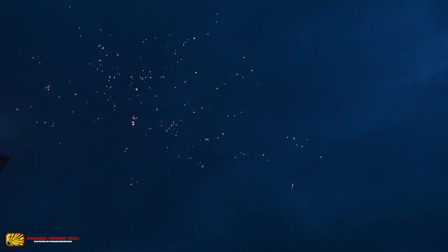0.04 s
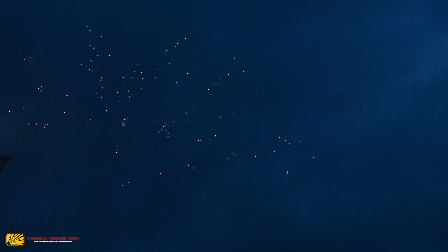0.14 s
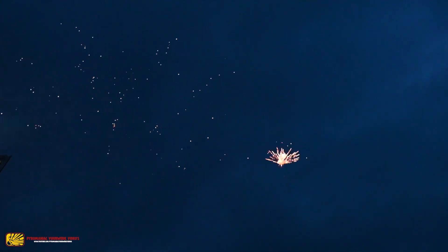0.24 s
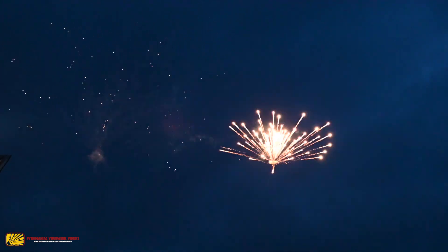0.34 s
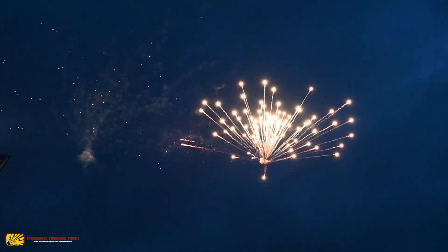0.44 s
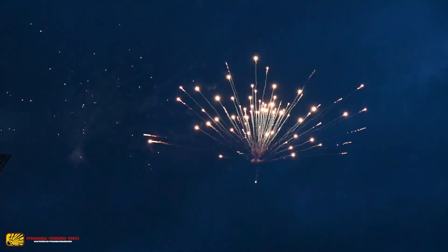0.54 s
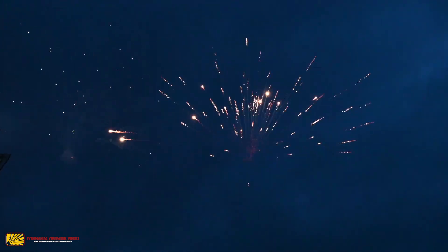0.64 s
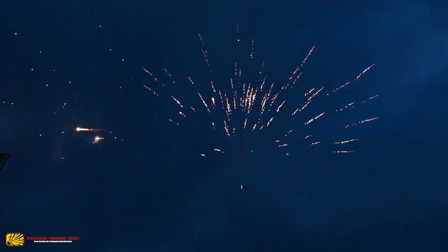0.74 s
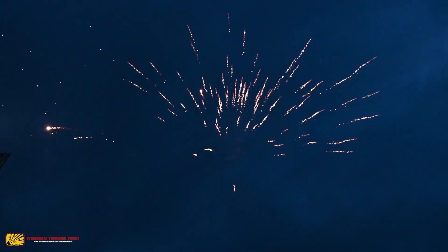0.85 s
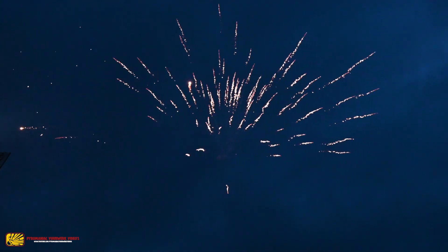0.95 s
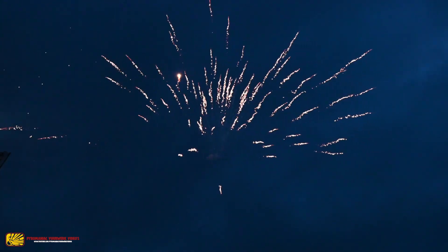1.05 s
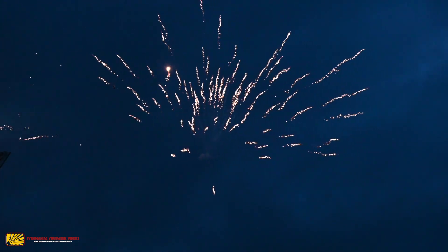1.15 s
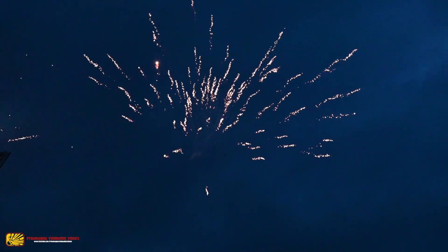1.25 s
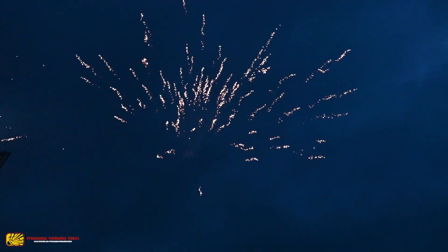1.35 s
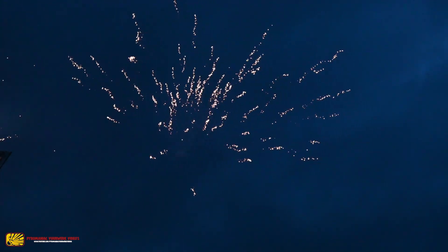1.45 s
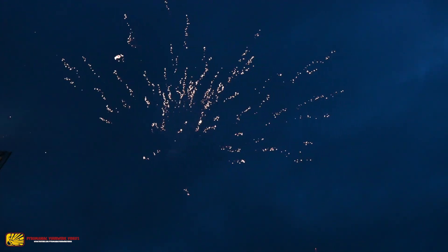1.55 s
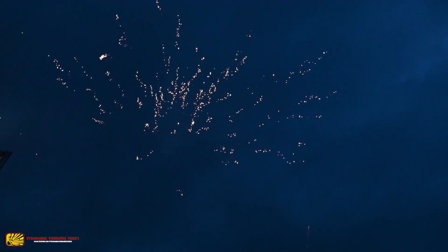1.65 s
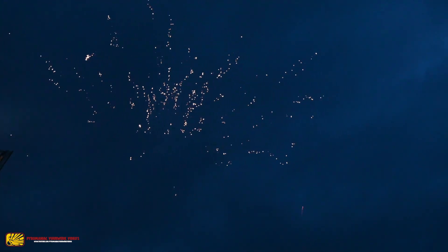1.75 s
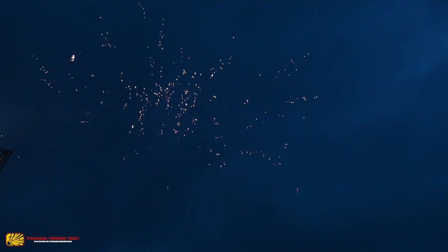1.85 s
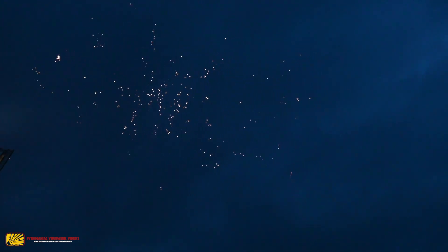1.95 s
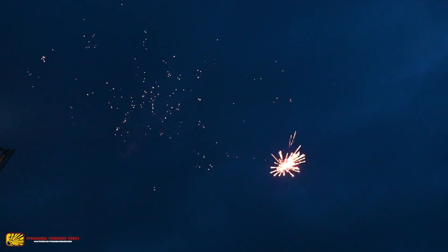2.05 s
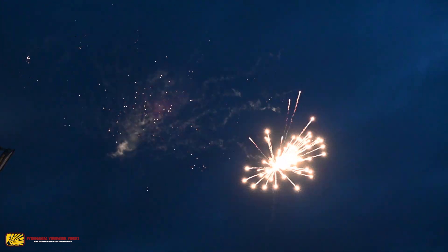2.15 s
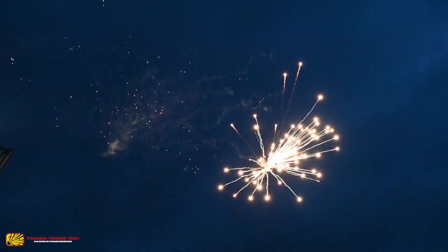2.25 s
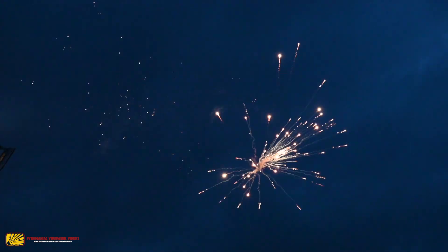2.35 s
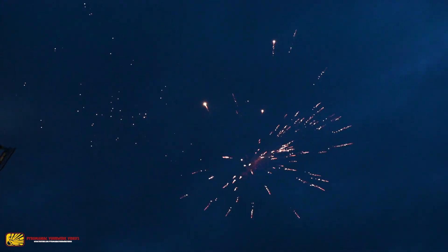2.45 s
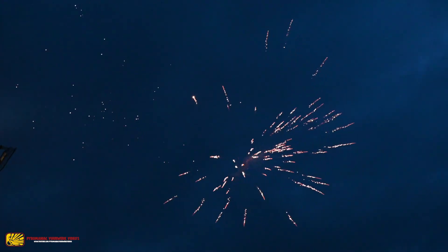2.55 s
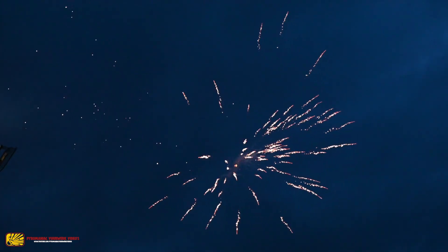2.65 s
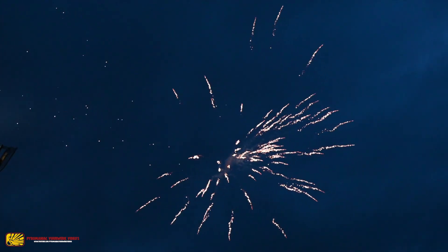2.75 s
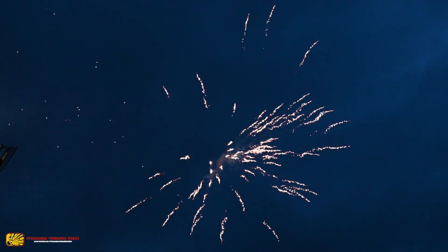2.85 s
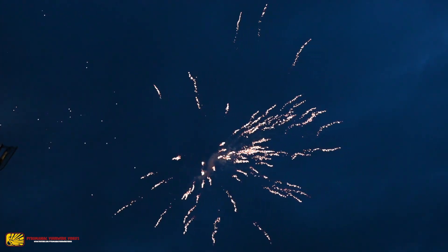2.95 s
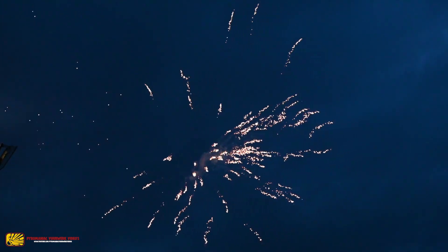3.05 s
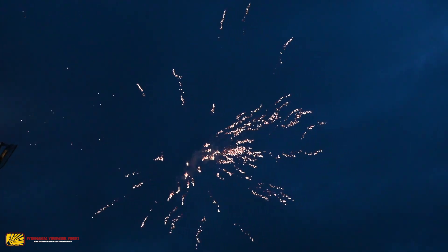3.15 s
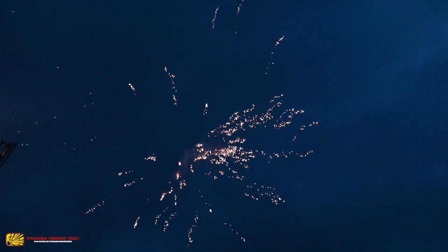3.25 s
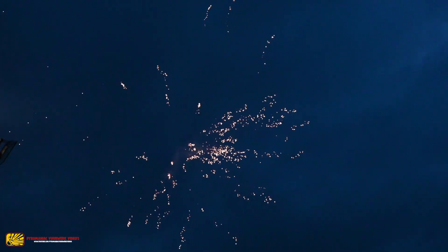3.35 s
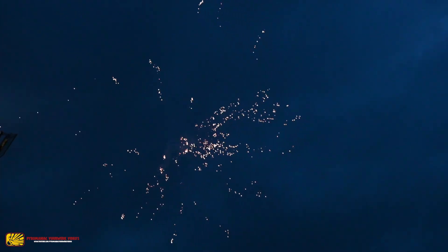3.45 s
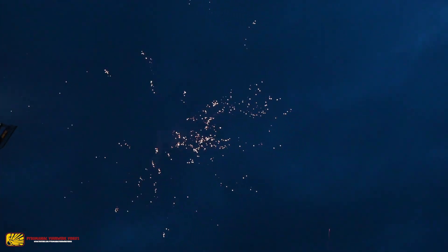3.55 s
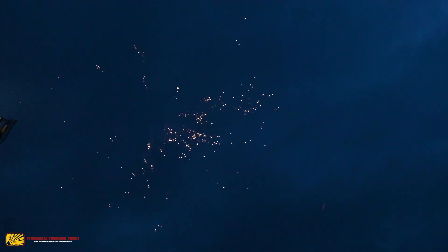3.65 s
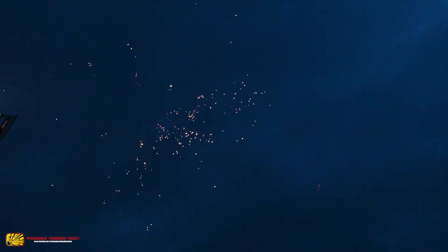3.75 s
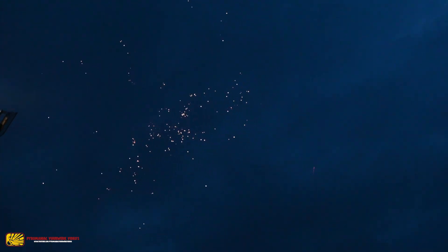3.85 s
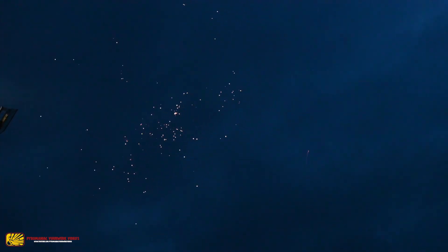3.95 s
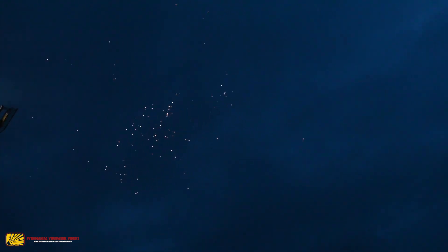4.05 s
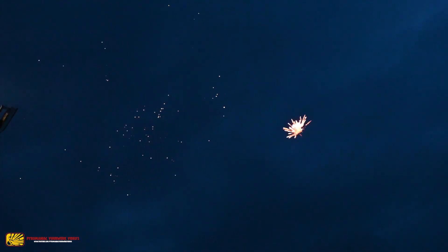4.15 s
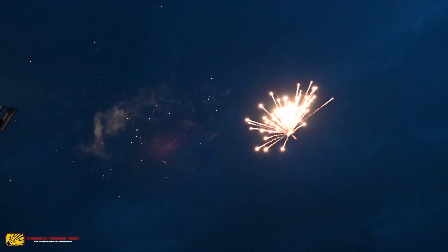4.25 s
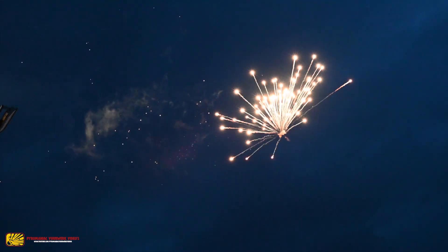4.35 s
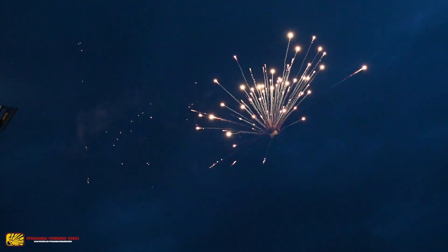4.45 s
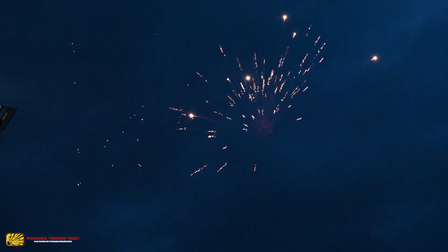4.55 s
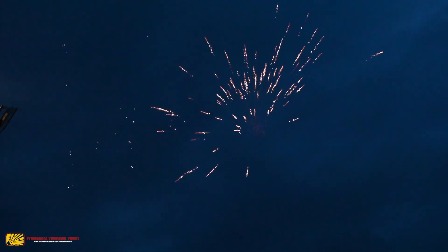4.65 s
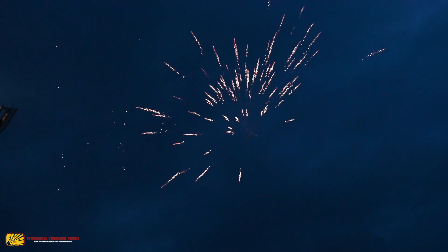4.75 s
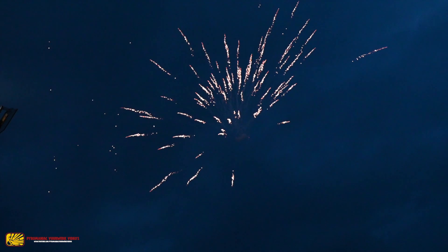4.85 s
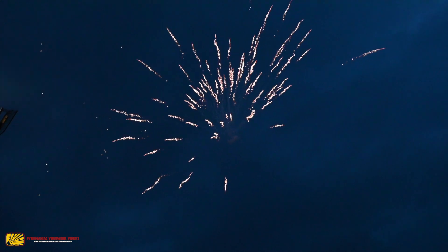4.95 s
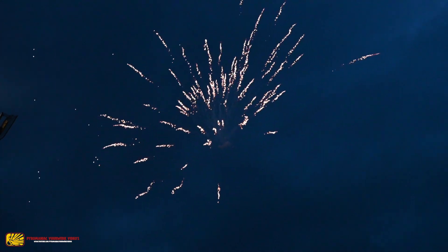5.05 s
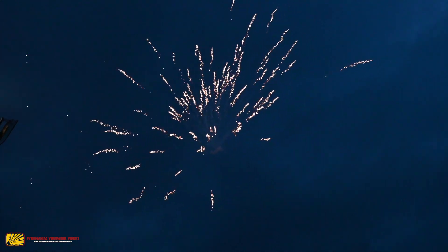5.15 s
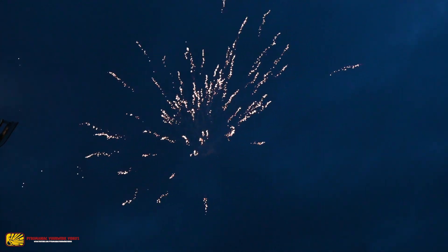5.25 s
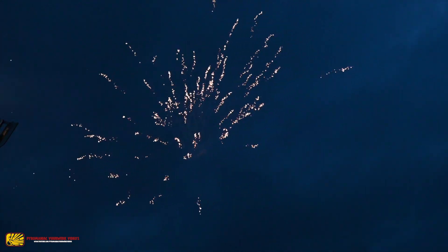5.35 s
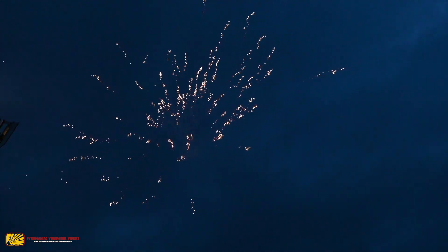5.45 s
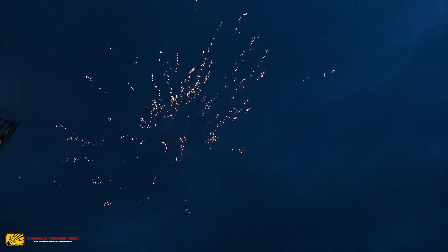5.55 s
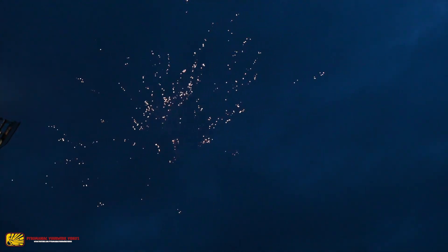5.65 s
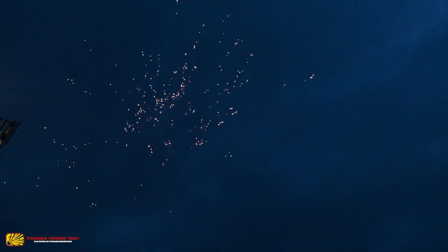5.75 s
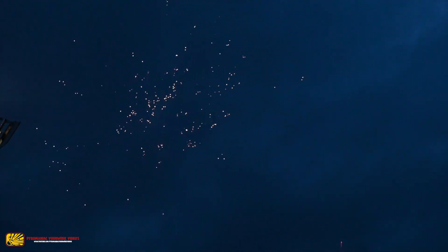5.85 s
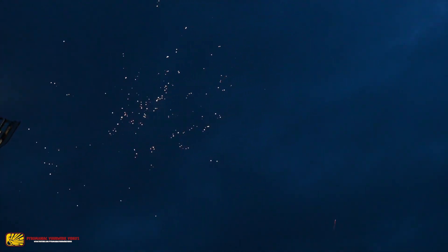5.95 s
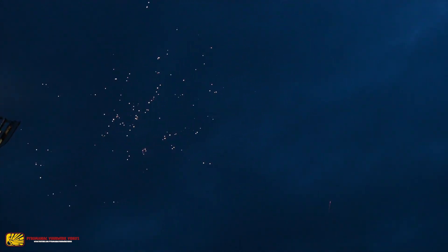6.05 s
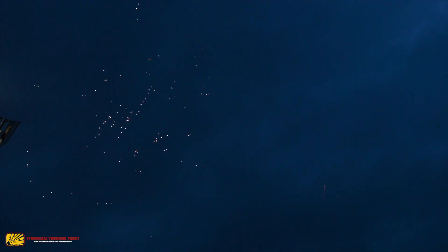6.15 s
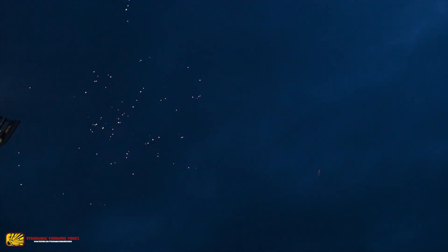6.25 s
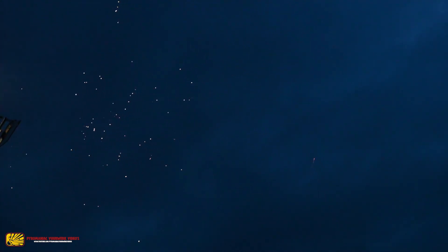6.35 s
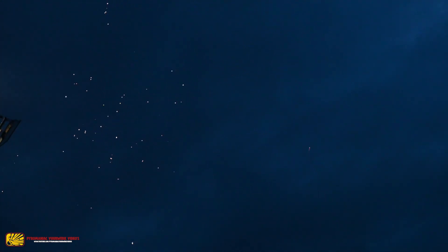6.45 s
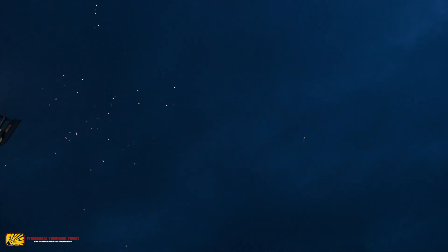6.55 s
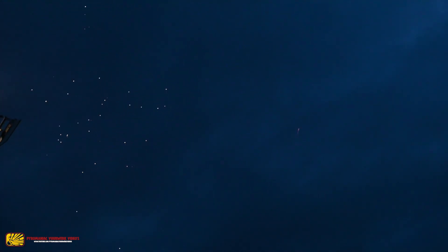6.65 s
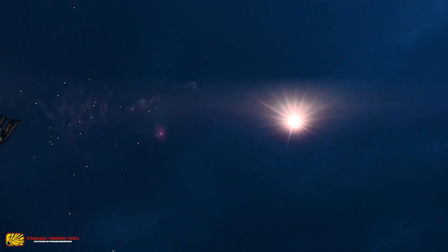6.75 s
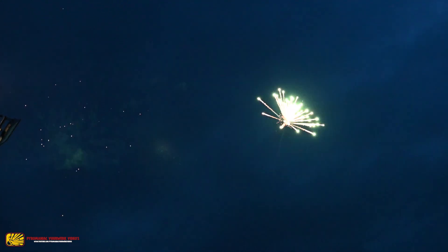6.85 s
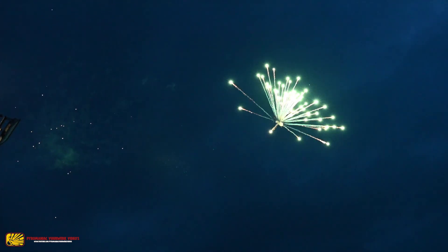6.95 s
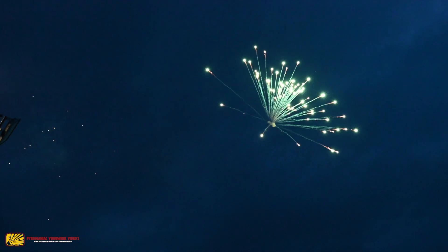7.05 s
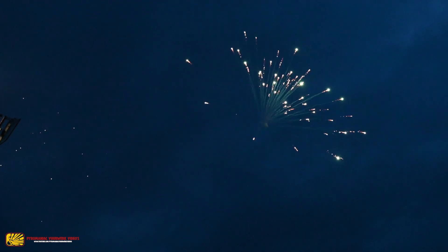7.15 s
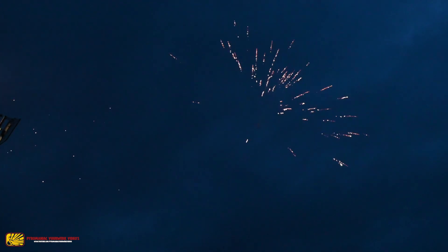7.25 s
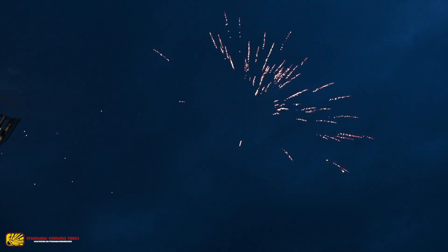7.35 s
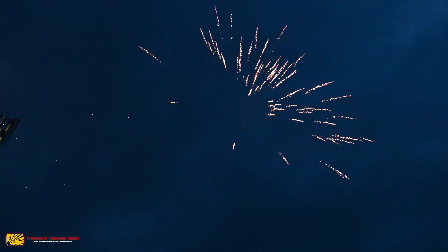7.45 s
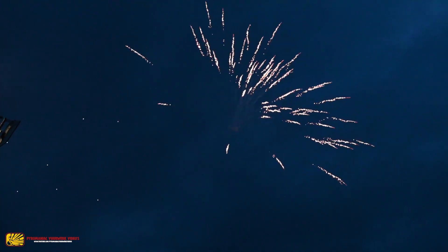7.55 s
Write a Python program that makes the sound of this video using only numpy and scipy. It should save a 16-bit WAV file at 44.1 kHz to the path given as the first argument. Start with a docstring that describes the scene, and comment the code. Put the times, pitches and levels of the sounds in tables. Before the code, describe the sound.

Open field at night, picked up by a phone with two exposed microphone ports. Gusty wind rumbles and flutters throughout over a thin, wavering hiss, with blunt slaps mostly on the right. At about 0.5 s a firework shell bursts overhead: a hard, clipped crack and short ringing boom, then lumpy echoes from walls and trees fading over a second or so. Tiny breathy high chirps appear faintly up to 2.2 s. A hollow launch thud sounds at 1.1 s, and a second overloaded burst at 2.3 s. Another tube thump follows at 3.0 s amid strong wind knocks until about 4 s, with a third bang at 4.4 s. A last thud comes at 5.5 s. From there the wind grows fierce, battering the right side through 6 and 7 s. The fourth shell explodes at 7.1 s, its echoes trailing to the end. Sparse, faint, bright star crackles dot the gaps.

```python
"""Gusty wind blows throughout, slapping a phone's two microphone ports on an open field at night, over a thin hiss.
Half a second in, a firework shell bursts overhead and overdrives the microphones; three more follow,
and lift charges thud in their tubes between them. Walls and trees send scattered echoes back.
Wind is noise and random eddies, harder on the right port; bursts are pressure pulses with a ringing boom;
launches are puffs ringing a tube; burning stars crackle as snaps of bright noise; faint chirps are narrow noise."""
import sys
import numpy as np
from scipy import signal
from scipy.fft import rfft, irfft
from scipy.io import wavfile
from scipy.ndimage import uniform_filter1d

SR = 44100
rng = np.random.default_rng(int(sys.argv[2]) if len(sys.argv) > 2 else 0)


def int16_out(signal):
    """Quantize to a 16-bit WAV file."""
    q = np.round(np.clip(np.atleast_2d(signal).T, -1, 1) * 32767)
    wavfile.write(sys.argv[1], SR, q.astype(np.int16))


N = 335160


def undb(db):
    """Gain of a level in dB."""
    return 10 ** (np.asarray(db) / 20)


def unit(x):
    """Scale to rms 1."""
    return x / np.sqrt(np.mean(x ** 2))


def clock(length_s):
    """Sample times from zero, in seconds."""
    return np.arange(int(length_s * SR)) / SR


def low(x, hz, order=4):
    """Butterworth low-pass."""
    return signal.sosfilt(signal.butter(order, hz, fs=SR, output="sos"), x)


def band(x, lo_hz, hi_hz, order=2):
    """Butterworth band-pass."""
    edges = [lo_hz, min(hi_hz, .45 * SR)]
    return signal.sosfilt(signal.butter(order, edges, "band", fs=SR, output="sos"), x)


def ring(x, modes):
    """Sum of resonances."""
    return sum(undb(db) * band(x, hz - w / 2, hz + w / 2, order=1) for hz, w, db in modes)


def sides(pan_db):
    """Left and right gains for a level difference, left minus right."""
    return undb(np.array([pan_db, -pan_db]) / 2)


def add(out, s, x):
    """Mix x into out from time s."""
    i = int(s * SR)
    n = min(x.shape[-1], N - i)
    out[:, i:i + n] += x[..., :n]


def walk(rate):
    """Random levels, drawn rate times a second, with straight glides between them."""
    k = int(SR / rate)
    held = np.repeat(rng.standard_normal(N // k + 1), k)
    return 1.02 * uniform_filter1d(held, k)[:N]


# spectrum of the night air across the field: (frequency [Hz], relative level [dB per Hz])
NIGHT_SPECTRUM = [(750, -3.5), (1100, 4.5), (1600, -8.5), (2300, -5), (2900, -28), (4000, -13), (5200, -21),
                  (9000, -26.5), (15000, -20)]
# hiss of the night and of far burning stars: (time [s], level [dB])
HISS_LEVELS = [(0, -53), (1.001, -56.5), (1.7, -52), (2.2, -53.5), (3.2, -49.5), (4.3, -51.5), (5.2, -53.5),
               (6.0, -53), (6.901, -54), (7.6, -48.5)]
# a narrow flickering band, level relative to the rest of the hiss
SHIMMER_HZ, SHIMMER_WIDTH_HZ, SHIMMER_DB = 3266, 280, -13
SHIMMER_S, SHIMMER_FADE_S = 3.8, 1  # it is clearest then, and 1 dB down this far away


def night():
    """Hiss of the distant surroundings: third-octave steps of noise bands, each wavering by itself."""
    t = np.arange(N) / SR
    hz, db = np.transpose(NIGHT_SPECTRUM)
    hiss = 0
    for centre in 750 * 2 ** np.arange(0, 4.4, 1 / 3):
        level_db = np.interp(np.log(centre), np.log(hz), db)
        level_db = level_db + 10 * np.log10(centre)  # bands widen with frequency
        level_db = level_db + 0.5 * walk(2.1) + 3.1 * walk(30)
        noise = band(rng.standard_normal((2, N)), centre / 1.2, centre * 1.2)
        hiss = hiss + undb(level_db) * unit(noise)
    shimmer_db = SHIMMER_DB + 3.8 * walk(25) - ((t - SHIMMER_S) / SHIMMER_FADE_S) ** 2
    half_hz = SHIMMER_WIDTH_HZ / 2
    shimmer = band(rng.standard_normal((2, N)), SHIMMER_HZ - half_hz, SHIMMER_HZ + half_hz)
    hiss = unit(hiss) + undb(shimmer_db) * unit(shimmer)
    return undb(np.interp(t, *np.transpose(HISS_LEVELS))) * unit(hiss)


# wind at the sheltered left port: (time [s], rumble level [dB])
WIND_LEFT_LEVELS = [(0.0, -20), (0.1, -32.5), (0.32, -30.5), (0.68, -23), (1.26, -32.5), (1.34, -25),
                    (1.38, -38), (1.6, -24.5), (1.66, -37), (1.82, -33), (1.88, -26.5), (2.1, -36.5),
                    (2.44, -25.5), (2.64, -31), (2.76, -23), (2.96, -39), (3.02, -27), (3.08, -30.5),
                    (3.34, -30), (3.62, -30.5), (3.8, -37.5), (3.94, -27.5), (4.14, -39), (4.56, -27),
                    (4.76, -33), (5.22, -34), (5.4, -39.5), (5.48, -21), (5.72, -32.5), (7.58, -24.5)]
# wind at the exposed right port: (time [s], rumble level [dB])
WIND_RIGHT_LEVELS = [(0.0, -21), (0.1, -21), (0.2, -23), (0.24, -30.5), (0.3, -19.5), (0.36, -34),
                     (0.44, -27), (0.5, -24), (0.68, -20.5), (0.8, -22), (0.88, -24.5), (1.0, -27.5),
                     (1.08, -24), (1.16, -30), (1.3, -26.5), (1.34, -27), (1.5, -26), (1.6, -23.5),
                     (1.7, -27), (1.72, -44), (1.74, -30), (1.98, -26.5), (2.04, -24.5), (2.1, -28),
                     (2.44, -24.5), (2.64, -26.5), (2.72, -26), (2.82, -21), (2.88, -20.5), (2.94, -18.5),
                     (2.98, -17.5), (3.1, -23), (3.16, -39), (3.18, -28), (3.34, -31.5), (3.46, -26.5),
                     (3.66, -19.5), (3.76, -24), (3.919, -15), (4.12, -28.5), (4.36, -32), (4.66, -17),
                     (4.72, -21), (4.8, -20), (4.9, -28.5), (5.0, -24), (5.14, -30.5), (5.36, -22),
                     (5.44, -26), (5.5, -15), (5.56, -16.5), (5.6, -15), (5.655, -14.5), (5.72, -22),
                     (5.8, -22), (6.08, -18), (6.2, -17), (6.32, -21.5), (6.38, -18.5), (6.42, -20),
                     (6.48, -14.5), (6.56, -21.5), (6.659, -14), (6.78, -23), (6.9, -16.5), (6.96, -21),
                     (7.16, -15.5), (7.32, -24), (7.38, -17), (7.52, -17), (7.58, -13)]
# strong eddies slapping the right port: (time [s], peak [dB], swing scale [Hz], low-pass edge [Hz])
WIND_SLAPS = [(0.0482, -22, 650, 700), (0.061, -11, 280, 1200), (0.0891, -6.5, 330, 970),
              (0.112, -21, 650, 900), (0.1784, -14, 630, 1390), (0.1972, -28, 380, 900),
              (0.2167, -24, 290, 1000), (0.2448, -25, 500, 750), (0.283, -15.5, 650, 1030),
              (0.2955, -24, 650, 704), (0.3874, -11.5, 280, 700), (0.4567, -21, 600, 700),
              (0.4675, -19, 300, 696), (0.836, -17.5, 650, 1900), (0.8762, -23, 330, 850),
              (0.884, -16.5, 290, 1000), (0.948, -21.5, 530, 1350), (1.054, -34, 320, 800),
              (1.2829, -13.5, 280, 1000), (1.383, -16.5, 650, 910), (1.3913, -23, 650, 950),
              (1.411, -20, 610, 900), (1.5072, -21, 450, 750), (1.5672, -18, 610, 796),
              (1.6722, -20.5, 317, 750), (1.7668, -22, 283, 850), (1.877, -16, 650, 715),
              (1.9434, -20, 650, 705), (2.1132, -17, 320, 800), (2.1361, -20, 650, 695),
              (2.159, -27, 280, 1100), (2.21, -23, 350, 750), (2.2207, -23, 650, 800),
              (2.2425, -14, 280, 910), (2.26, -24, 650, 750), (2.401, -26, 650, 1850),
              (2.5712, -17, 650, 1530), (2.6777, -33, 330, 1250), (2.7126, -18, 300, 1550),
              (2.777, -29, 340, 1300), (2.789, -17, 280, 1000), (2.8072, -4.5, 280, 1460),
              (2.8239, -7, 290, 1000), (2.8319, -9, 650, 700), (2.862, -17, 646, 750),
              (2.9259, -9.5, 280, 1050), (2.937, -2, 282, 980), (2.9601, -8.5, 330, 1710),
              (2.9759, -13.5, 650, 950), (3.054, -6, 290, 900), (3.0596, -17.5, 650, 1800),
              (3.1, -18.0, 440, 1100), (3.526, -27, 650, 1900), (3.54, -19.5, 500, 750),
              (3.5836, -21, 380, 900), (3.5921, -8, 430, 985), (3.644, -12, 320, 955),
              (3.661, -13, 327, 800), (3.665, -13.5, 300, 950), (3.6921, -15.5, 360, 1250),
              (3.714, -15, 650, 700), (3.721, -21, 440, 1000), (3.822, -13, 520, 800),
              (3.8524, -9.5, 350, 1450), (3.8654, -12, 350, 1550), (3.8718, -9, 390, 1650),
              (3.9024, -7, 390, 1120), (3.9094, -3, 490, 1150), (3.9201, -0.5, 280, 1250),
              (3.9282, -2, 280, 1800), (3.9506, -10.5, 650, 805), (3.9875, -16, 320, 900),
              (4.005, -17, 650, 1200), (4.0362, -13, 650, 750), (4.077, -18, 310, 800),
              (4.6371, -7, 650, 1250), (4.657, -15, 650, 1350), (4.698, -15, 400, 1350),
              (4.7492, -16, 650, 700), (4.7583, -8, 400, 900), (4.7665, -18, 280, 900),
              (4.7915, -14.5, 500, 1300), (4.8362, -20, 420, 1300), (4.976, -22.5, 280, 1250),
              (5.186, -21, 437, 820), (5.2772, -35, 646, 795), (5.3216, -18.5, 525, 735),
              (5.3626, -15, 650, 805), (5.5094, -16, 280, 1710), (5.5162, -15, 530, 1200),
              (5.5433, -9, 500, 900), (5.56, -9, 560, 1010), (5.6053, -3.5, 280, 800),
              (5.638, -4, 380, 1190), (5.6556, -3.5, 600, 1320), (5.6837, -23, 280, 1400),
              (5.733, -16, 630, 750), (5.7457, -20, 536, 880), (5.7857, -13, 358, 785),
              (5.8029, -24, 280, 950), (5.8301, -12.5, 337, 1150), (5.931, -19, 440, 700),
              (5.9993, -9.5, 423, 696), (6.037, -9.5, 650, 1060), (6.0504, -2.5, 468, 1650),
              (6.0852, -15, 650, 960), (6.0957, -4, 280, 1750), (6.1198, -5, 420, 2400),
              (6.137, -21, 400, 1090), (6.156, -21, 400, 1300), (6.1698, -1, 280, 2220),
              (6.2052, -13, 500, 1490), (6.2093, -2.5, 280, 1090), (6.217, -14, 450, 1300),
              (6.2278, -13, 400, 1710), (6.2339, -3, 500, 1070), (6.2375, -8.5, 650, 2100),
              (6.2835, -12.5, 393, 705), (6.3526, -14.0, 280, 700), (6.3764, -10, 650, 1060),
              (6.3952, -7.5, 280, 706), (6.4633, -6, 320, 1400), (6.4702, -4.5, 540, 1600),
              (6.5068, -2, 390, 1780), (6.516, -14, 280, 1250), (6.544, -17, 450, 1300),
              (6.578, -10, 530, 1190), (6.588, -8, 500, 1490), (6.633, 3, 450, 2300),
              (6.6441, -7, 650, 910), (6.653, -9, 390, 2330), (6.6577, -4.5, 640, 1250),
              (6.6784, -5.5, 650, 1500), (6.694, -13, 398, 1500), (6.7097, -11, 500, 1710),
              (6.7135, -6, 330, 1490), (6.7217, -13, 390, 800), (6.739, -17, 500, 1500),
              (6.7562, -11, 280, 700), (6.8023, -1.5, 380, 2080), (6.8207, -5, 282, 1060),
              (6.845, -12, 280, 700), (6.8688, -15, 470, 1350), (6.891, -3, 540, 2300),
              (6.9063, -13.5, 500, 1800), (6.928, -20, 500, 1300), (6.9915, -8.5, 282, 1000),
              (7.0083, -8, 330, 1390), (7.0227, -9, 650, 1250), (7.0355, -8, 282, 850),
              (7.0504, -5.5, 390, 1400), (7.1426, -3, 280, 1440), (7.232, -10, 320, 1300),
              (7.2505, -16, 650, 1490), (7.2621, -10, 650, 950), (7.2712, -16, 650, 1650),
              (7.3336, -29, 410, 1300), (7.472, -12, 650, 850), (7.5142, -16, 650, 1700),
              (7.5441, -9, 400, 1700), (7.5537, -0.5, 660, 1200), (7.5555, -4, 660, 1430),
              (7.5627, -6.5, 500, 1000), (7.566, -7, 650, 1600), (7.576, -0.5, 290, 1620),
              (7.582, -7, 650, 1100)]
SLAP_PAN_DB = -35.5  # left minus right
# flutter grows faster than rumble: its level at a rumble of GUST_DB, and dB gained per dB of rumble
FLUTTER_DB, FLUTTER_SLOPE = [-39, -31], [1.7, 2.15]  # left, right
GUST_DB, FULL_DB = -20, -13.5  # above FULL_DB of rumble the flutter grows no more


def wind():
    """Turbulence knocks each port on its own: rolling rumble, eddy flutter sharper in gusts, and slaps."""
    t = np.arange(N) / SR
    ports = (WIND_LEFT_LEVELS, WIND_RIGHT_LEVELS)
    gust_db = np.array([np.interp(t, *np.transpose(port)) for port in ports])
    excess_db = np.minimum(gust_db, FULL_DB) - GUST_DB
    flutter = undb(np.c_[FLUTTER_DB] + np.c_[FLUTTER_SLOPE] * excess_db)
    rumble_db = gust_db + np.array([walk(4.7), walk(14)])  # the rumble rolls in lumps
    # quick lumps shared by rumble and flutter
    buffet = 1.67 * np.tanh(np.array([walk(35), walk(35)]) / 1.3)

    churn = rng.standard_normal((2, N)) * undb(3.35 * buffet)
    rumble = band(churn, 46, 152.4, order=1) + 0.2 * band(churn, 8.7, 49, order=1)
    rumble = low(rumble, 408)

    strikes = rng.random((2, N)) < 700 / SR  # about 700 small eddies a second at each port
    eddies = strikes * rng.standard_normal((2, N)) * undb(1.2 * rng.exponential(size=(2, N)))
    eddies = eddies * undb(3.5 * buffet)
    soft = low(band(eddies, 140, 556, order=1), 1022)
    sharp = low(band(eddies, 630, 1500, order=1), 1560)
    bite = np.minimum(flutter / undb(-18), 1) ** .5
    out = undb(rumble_db) * unit(rumble) + flutter * (unit(soft) + 0.3 * bite * unit(sharp))

    t = clock(.02)
    for s, db, hz, edge_hz in WIND_SLAPS:
        # a steep dip, then one slower swing back and a short rough wake
        swing = -np.sin(2 * np.pi * np.sqrt(0.83 * hz * t)) * np.exp(-t * hz / 0.75)
        wake = rng.standard_normal(len(t)) * np.exp(-t / 0.0037)
        slap = low(swing, edge_hz) + 0.78 * low(wake, 0.69 * edge_hz)
        add(out, s, undb([[db + SLAP_PAN_DB], [db]]) * slap / np.abs(slap).max())
    return out


# faint short chirps high up: (time of the middle [s], level [dB], frequency [Hz], swell time [s])
CHIRPS = [(0.358, -64, 5970, 0.0092), (0.787, -45.5, 4650, 0.028), (1.363, -60, 4550, 0.0087),
          (1.468, -57, 4080, .006), (1.953, -58, 5050, 0.005), (2, -60, 5000, .005),
          (2.108, -60, 5050, 0.005), (2.155, -63, 5050, 0.0034)]


def peeps():
    """Each chirp is a breathy narrow band of noise that swells and fades."""
    out = np.zeros((2, N))
    for s, db, hz, swell_s in CHIRPS:
        t = np.arange(-3 * swell_s, 3 * swell_s, 1 / SR)
        breath = unit(band(rng.standard_normal((2, len(t))), .96 * hz, 1.04 * hz))
        add(out, s - 3 * swell_s, undb(db) * breath * np.exp(-(t / swell_s) ** 2))
    return out


def rings(echoes, rise_s, t):
    """Each reflecting face sends back a short rough burst with its own tone."""
    out = np.zeros(len(t))
    for delay, _, hz, db in echoes:
        late = np.maximum(t - delay, 0)
        rough = low(band(rng.standard_normal(len(t)), .25 * hz, 1.5 * hz), 1.6 * hz)
        tone = np.sin(2 * np.pi * hz * late) + 1.1 * unit(rough)
        out += undb(db) * tone * late / rise_s * np.exp(1 - late / rise_s)
    return out


# diffuse return from the surroundings:
# (band centre [Hz], level [dB], time to fall 60 dB [s], left minus right [dB])
FIELD_BANDS = [(200, 2.5, 0.65, 1), (400, -0.5, 1.37, -0.5), (800, -4.5, 1.19, 0.5), (1540, -5.5, 1.27, 0),
               (2660, -7.5, 1.12, 3), (4200, -9.5, 1.02, 2), (7240, -12, 0.82, 3), (10300, -7, 0.77, 4.5),
               (14000, -16.5, 0.46, 1)]


def field(echoes, rise_s, smear_s):
    """Scattered return of one bang: a lumpy wash dying band by band, with bunched echoes on top."""
    t = clock(1.8)
    bunches = sum(undb(db) * (t > d) * np.exp(-np.abs(t - d) / smear_s) for d, db, *_ in echoes)
    shape = (1 - np.exp(-(t / rise_s) ** 2) + bunches) * undb(2.0 * walk(45.6)[:len(t)])
    # part of the return comes from one side and reaches the ports 7 samples apart
    common, own = rng.standard_normal(len(t)), rng.standard_normal((2, len(t)))
    noise = rfft(np.array([common, np.roll(common, 7)]) + 1.36 * own)
    log_hz = np.log(np.fft.rfftfreq(len(t), 1 / SR) + 1)
    centres = np.log([30] + [row[0] for row in FIELD_BANDS] + [SR / 2])
    wash = 0
    for k, (_, db, t60, pan_db) in enumerate(FIELD_BANDS):
        # overlapping triangles share the spectrum evenly
        share = np.interp(log_hz, centres[k:k + 3], [0, 1, 0])
        decay = undb(db - 60 * t / t60 + 3.0 * walk(40.6)[:len(t)])
        wash = wash + decay * sides(pan_db)[:, None] * unit(irfft(noise * share, len(t)))
    return shape * wash


# shells bursting overhead: (time [s], boom left [dB], boom right [dB],
# suction factor left, suction factor right, echo level [dB])
SHELL_BURSTS = [(0.5224, 8, 8.5, 0.17, 0.42, -26.5), (2.2907, -47, -50, 2.5, 2, -28.5),
                (4.4106, -54, -20, 2, 2.43, -28.5), (7.0655, 5, -10, -0.4, 1.4, -29.5)]
# returns from walls and trees: (delay [s], bunch in the wash [dB], ring [Hz], ring level [dB])
SHELL_ECHOES = [(.020, 7.5, 831, -5), (.0285, 1.5, 940, -24), (.036, 1, 860, -22), (.054, -1, 1090, 0),
                (.108, -23, 900, -10), (.128, 2, 558, 8.5), (.14, 5, 695, 0), (.16, -1.5, 522, 2.5),
                (.23, -7, 487, -2)]
# resonances of the boom: (frequency [Hz], width [Hz], level [dB])
BOOM_MODES = [(129.4, 240, -6), (341, 95, 17), (1120, 83, -4), (1360, 72, -17)]


def bursts():
    """Crack, a short push of pressure and a long suction; a ringing boom; the field answers."""
    out, t = np.zeros((2, N)), clock(.4)
    push_s = .0024
    after = np.maximum(t - push_s, 0)
    wiggle = np.array([[1], [.4]]) * np.cos(2 * np.pi * 6500 * (t - .00012))  # left, right
    crack = 0.93 * (t < .00008) - (t > .0001) * (t < .0004) * (0.89 + wiggle)
    push = (t > .0004) * (t < push_s) * (.8 + 5 * np.exp(-t / .00035))
    release = .8 * (t >= push_s) * np.exp(-after / .002)
    pull = (1 - np.exp(-after / .009)) * np.exp(-after / .025)
    for s, boom_l, boom_r, suck_l, suck_r, echo_db in SHELL_BURSTS:
        common = rng.standard_normal(len(t))
        noise = np.array([common, np.roll(common, 6)]) + .5 * rng.standard_normal((2, len(t)))
        boom = ring(noise, BOOM_MODES)
        boom = boom / np.std(boom) * (2.23 * np.exp(-t / 0.003) + 0.23 * np.exp(-t / 0.038))
        pressure = crack + push + release - np.array([[suck_l], [suck_r]]) * pull
        add(out, s, pressure + undb([[boom_l], [boom_r]]) * boom)
        add(out, s, undb(echo_db) * rings(SHELL_ECHOES, 0.003, t)[None])
        add(out, s, undb(echo_db) * field(SHELL_ECHOES, rise_s=0.068, smear_s=0.0074))
    return out


# the clearer snaps of crackling stars: (time [s], peak [dB], centre [Hz], left minus right [dB])
STAR_SNAPS = [(1.266, -30, 8900, 7), (1.5, -47, 9670, 12), (1.7928, -50, 4200, -0.5),
              (1.8642, -43.5, 4770, -1), (2.0712, -46, 5000, -2), (2.2578, -46, 4130, 0.0),
              (3.272, -36, 8800, 9), (3.5197, -32.5, 8550, 9), (3.691, -41, 3950, -4),
              (3.9205, -50, 4180, -6), (4.133, -48, 4430, 5), (4.1934, -42, 4520, 2),
              (4.2487, -43, 6780, -1), (4.2697, -41, 4510, 0), (.5585, -15.5, 7440, 8.5),
              (.5775, -14.5, 6000, 9.5), (5.1545, -45, 6410, 8), (5.2939, -47, 7010, 6),
              (5.5553, -39.5, 5400, -13), (5.601, -44, 5800, 3), (5.767, -46, 5620, 6),
              (6.031, -46, 4200, -2), (6.6323, -53, 4430, -17), (6.8219, -45.5, 4580, -4.5),
              (7.3994, -45, 4090, -8), (7.5098, -44, 9500, 5), (7.5732, -42, 4070, -13)]
FAINT_PER_S, FAINT_DB, FAINT_HZ = 4, -49.5, 5000  # fainter snaps: rate, middle peak and middle centre


def crackles():
    """Tiny bright snaps of burning stars, over a random scatter of fainter ones."""
    out, t = np.zeros((2, N)), clock(.06)
    when, size, tone, side = rng.random((int(FAINT_PER_S * N / SR), 4)).T
    faint_db = FAINT_DB + 6 * (size - .5)
    faint_hz = FAINT_HZ * (.8 + .4 * tone)
    faint = zip(when * N / SR, faint_db, faint_hz, 8 * (side - .5))
    for s, db, hz, pan_db in [*STAR_SNAPS, *faint]:
        snap = band(rng.standard_normal((2, len(t))) * np.exp(-t / .006), .7 * hz, 1.45 * hz)
        add(out, s, undb(db) * sides(pan_db)[:, None] * snap / np.abs(snap).max())
    return out


# lift charges in the tubes: (time [s], peak of the direct shot [dB], wash level [dB])
LIFT_CHARGES = [(1.068, -7.5, -41), (2.9905, -9.5, -44.5), (5.4537, -10, -43)]
# returns from near walls: (delay [s], bunch in the wash [dB], ring [Hz], ring level [dB])
LIFT_ECHOES = [(.0055, 6, 2570, -17.5), (.0345, 10, 1140, -10), (.0352, -10, 420, -8.5),
               (.042, 10, 920, -20), (.10, 3.5, 900, -27), (.19, 9, 1000, -27)]
# resonances of a tube: (frequency [Hz], width [Hz], level [dB])
TUBE_MODES = [(283, 170, 4), (1040, 180, -1), (2500, 470, -7.5)]


def launches():
    """A dull puff rings the tube, comes back from near walls and washes out."""
    out, t = np.zeros((2, N)), clock(.3)
    for s, peak_db, wash_db in LIFT_CHARGES:
        puff = (rng.standard_normal(len(t)) - 1.2) * np.exp(-t / .0016)
        shot = ring(puff, TUBE_MODES)
        near = shot / np.abs(shot).max() + rings(LIFT_ECHOES, 0.001, t)
        add(out, s, undb(peak_db) * near[None])
        add(out, s, undb(wash_db) * field(LIFT_ECHOES, rise_s=0.0016, smear_s=0.0023))
    return out


def scene():
    """All sources at the two ports."""
    return night() + wind() + peeps() + bursts() + crackles() + launches()


# colour of the microphone ports: (frequency [Hz], level [dB])
PORT_COLOUR = [(20, 0), (9400, 0), (10200, -11), (13000, -20), (16000, -28), (20000, -32)]
# the pinned diaphragm ticks as it comes free: (time after a burst [s], peak [dB])
UNSTICK_TICKS = [(0.0204, -19.5), (0.0282, -19.5)]
TOP_HZ = 16400  # top cut


def record(dry):
    """Capsules hit their stops and go deaf under a blast; ports dull the top; bass cut, clipping, top cut."""
    slow = low(dry, 120, order=1)
    # the slow pressure drives the diaphragm to its stop, where it no longer follows quick sound
    strain = 1 + np.abs(slow / np.where(slow > 0, 1.2, .5)) ** 8
    capsule = slow / strain ** (1 / 8) + (dry - slow) / strain ** (9 / 8)
    tick = np.exp(-np.arange(200) / SR / .0006)
    for s, _, _, *suction, _ in SHELL_BURSTS:
        pinned = np.c_[suction] > 1  # only strong suction pins a port's diaphragm
        for delay, tick_db in UNSTICK_TICKS:
            add(capsule, s + delay, -undb(tick_db) * pinned * tick)
    hz, db = np.transpose(PORT_COLOUR)
    log_hz = np.log(np.fft.rfftfreq(2 * N, 1 / SR) + 1)
    colour = undb(np.interp(log_hz, np.log(hz), db))
    coloured = irfft(rfft(capsule, 2 * N) * colour)[:, :N]
    coupled = signal.sosfilt(signal.butter(1, 52, "high", fs=SR, output="sos"), coloured)
    clipped = np.clip(1.3 * coupled, -1, 1)
    return signal.sosfilt(signal.ellip(8, .2, 40, TOP_HZ, fs=SR, output="sos"), clipped)


dry = scene()
out = record(dry)
int16_out(out)
```